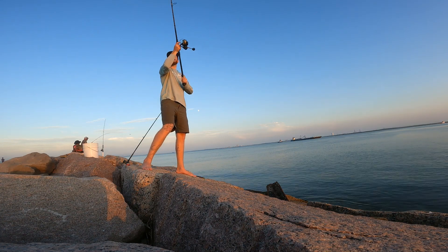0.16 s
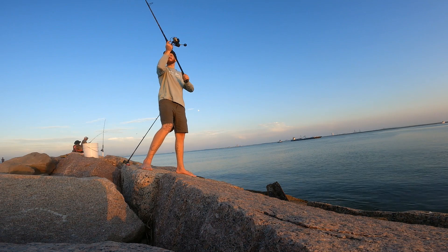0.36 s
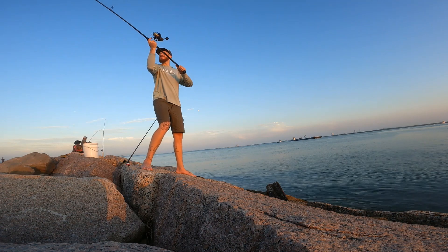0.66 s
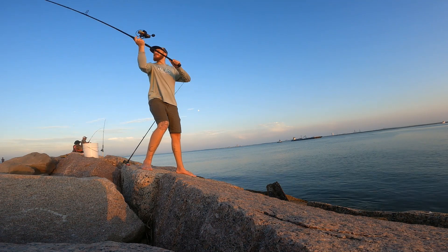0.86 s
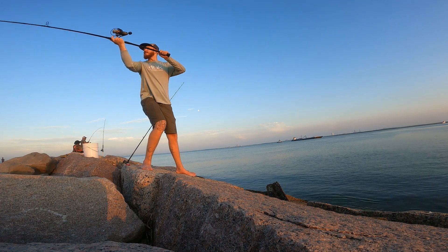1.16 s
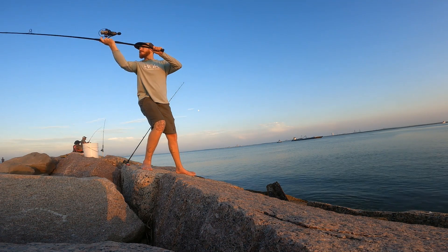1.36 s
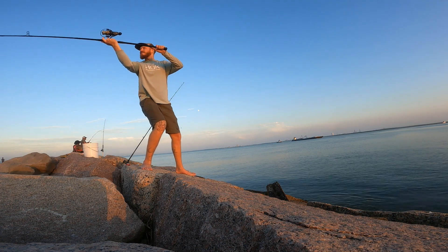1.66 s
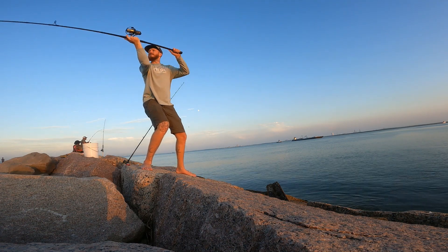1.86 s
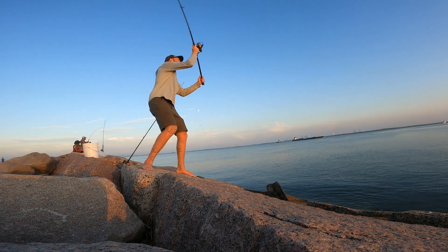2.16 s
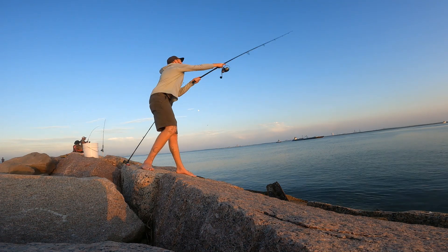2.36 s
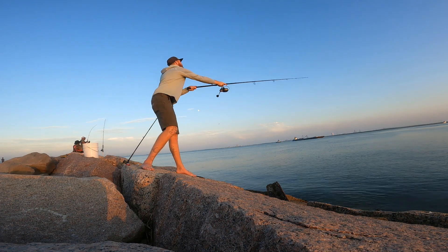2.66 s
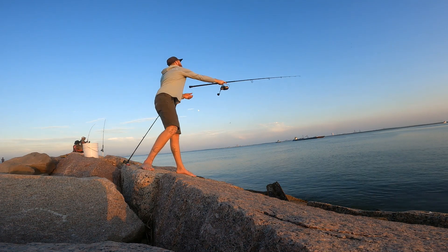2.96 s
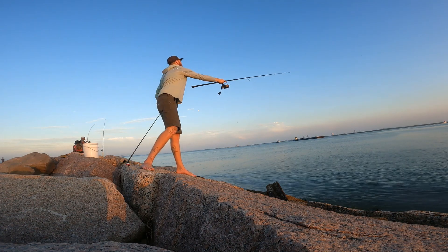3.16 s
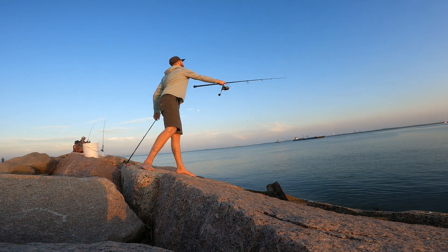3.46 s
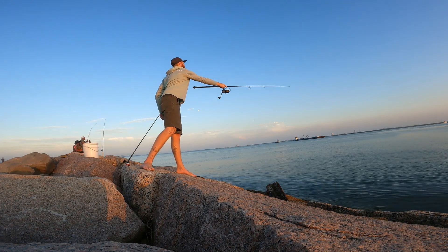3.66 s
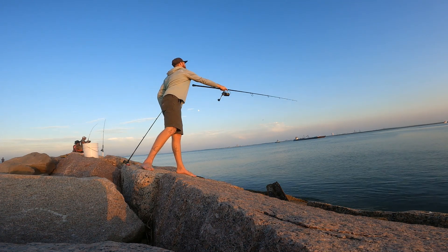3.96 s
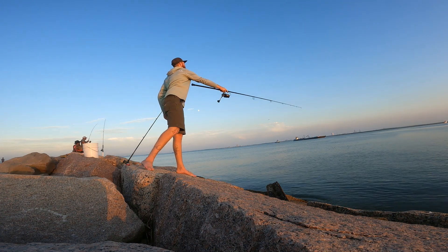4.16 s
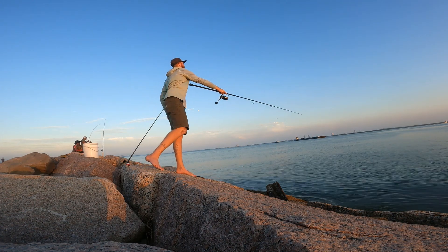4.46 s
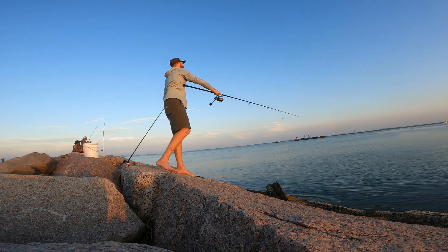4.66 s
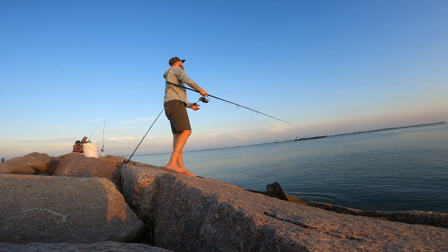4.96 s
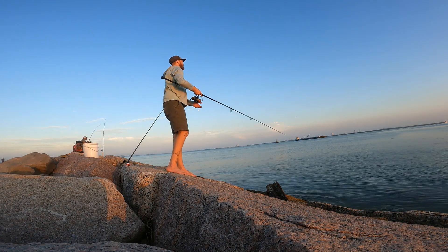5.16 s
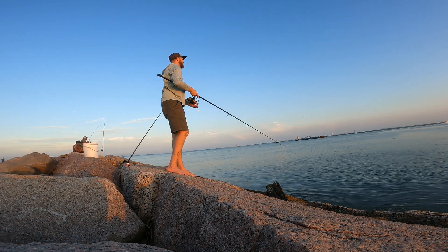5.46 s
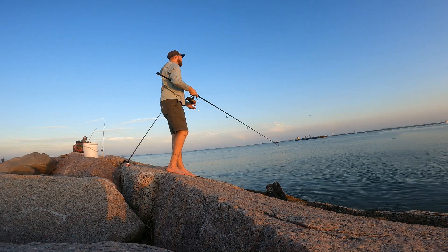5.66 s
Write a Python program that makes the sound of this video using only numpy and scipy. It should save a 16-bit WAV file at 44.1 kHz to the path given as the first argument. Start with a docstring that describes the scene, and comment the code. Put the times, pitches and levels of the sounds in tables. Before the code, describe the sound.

The whole six seconds sit on a steady low rumble of far diesel engines, beating slowly, with a soft wash of small waves and tiny ringing droplets among rocks. In the first two seconds there are only faint handling clicks and very quiet birdlike chirps. A slightly clearer reel click comes at 2.3 s, then at about 2.4 s the rod swings: a very short, ragged, rising swish, by far the loudest event, topped by a cluster of dry, bright snaps. From 2.5 s line hisses thinly off the spool, airy and fluttering, with brief squeals until about 3.1 s and irregular taps. Small rising zips occur around 3.4-3.6 s. The hiss gradually weakens and darkens, with more light taps near 4.5-4.7 s. At 4.9 s it stops with a dry metallic clack and short rattle. Water and engine rumble continue. Open air, stereo, only slight scatter from the rocks.

```python
"""Rock jetty by the water: an angler makes one long cast with a spinning rod.
The rod and line swish as moving tones in ragged noise; the released line cracks on the guides as short bursts.
It then hisses off the spool as noise tied to a falling line speed, with squeals and taps, until the bail clacks.
Behind: noise wash of small waves, ringing droplets, beating ship diesels in harmonics, faint chirps."""
import sys
import numpy as np
from scipy import signal
from scipy.fft import rfft, irfft
from scipy.io import wavfile
from scipy.ndimage import uniform_filter1d, map_coordinates

SR = 44100
rng = np.random.default_rng(int(sys.argv[2]) if len(sys.argv) > 2 else 0)


def wav_out(sig):
    """Save sig, one row per channel (or a flat mono array), as 16-bit PCM at SR to the path in sys.argv[1]."""
    wavfile.write(sys.argv[1], SR, np.round(np.clip(np.atleast_2d(sig).T, -1, 1) * 32767).astype(np.int16))


N = 255780
TIME = np.arange(N) / SR  # s
BINS = np.fft.rfftfreq(N, 1 / SR)  # Hz


# Rod strokes, forward swing then tip spring-back: t at full speed/s, rise/s, hold/s, fall/s,
# air rush level/dB, shaft level/dB, tip level/dB, tip f at t/Hz, tip width/Hz
ROD_STROKES = [(2.424, 0.032, 0.018, 0.024, -35.5, -39, -41, 2328, 600),
               (2.525, 0.083, 0.011, 0.017, -62, -60, -49.5, 2580, 191)]
# Air rush spectrum: f/Hz, relative level/dB
AIR_RUSH = [(300, -0.5), (520, 11), (690, 22.5), (850, 6.5), (1250, 7), (1550, -10), (1950, 6),
            (3000, -5.5), (4200, 5.5), (5000, -7), (6000, 0.5), (7500, -6.5), (8800, -9), (12000, -18),
            (15000, -31)]
# Thin line swung up to speed; f holds at LEADER_S
LEADER_S, LEADER_RISE_S, LEADER_HOLD_S, LEADER_FALL_S = 2.345, 0.048, 0.064, 0.03
LEADER_DB, LEADER_HZ, LEADER_GLIDE_HZ_PER_S, LEADER_WIDTH_HZ = -56, 4720, 22000, 1700
TIP_GLIDE_HZ_PER_S = 1300
# Thick shaft, loudest just after the tip
SHAFT_LAG_S, SHAFT_RISE_S, SHAFT_HOLD_S, SHAFT_FALL_S = 0.0034, 0.021, 0.038, 0.0075


def swish(shaft_ratio=0.435, shaft_wander_hz=70, ragged_db=2.0, ragged_hz=130):
    """Shed vortices: the thick shaft sings low, the thin tip higher, the line highest, over an air rush."""
    leader_hz = LEADER_HZ + LEADER_GLIDE_HZ_PER_S * (TIME - LEADER_S)
    leader_gain = envelope(LEADER_S, LEADER_RISE_S, LEADER_HOLD_S, LEADER_FALL_S)
    out = amp(LEADER_DB) * whistle(leader_hz, LEADER_WIDTH_HZ) * leader_gain
    rush = unit(noise(AIR_RUSH))
    for s, rise, hold, fall, rush_db, shaft_db, tip_db, hz, tip_width in ROD_STROKES:
        tip_hz = hz + TIP_GLIDE_HZ_PER_S * (TIME - s)
        tip = amp(tip_db) * whistle(tip_hz, tip_width)
        out += (amp(rush_db) * rush + tip) * envelope(s, rise, hold, fall)
        shaft = amp(shaft_db) * tone(shaft_ratio * tip_hz, shaft_wander_hz)
        out += shaft * envelope(s + SHAFT_LAG_S, SHAFT_RISE_S, SHAFT_HOLD_S, SHAFT_FALL_S)
    return out * unit(amp(ragged_db * drift(ragged_hz)))


# Line whipping tight on the guides: t/s, level/dB, rise/s, decay/s, ring centre f/Hz, ring spread/Hz,
# share of broad crack/0-1, crack treble edge f/Hz
LINE_WHIPS = [(2.4145, -27, 0.00058, 0.0015, 4170, 600, .55, 8000),
              (2.4162, -29.5, 0.00046, .0018, 6000, 900, 1, 18000),
              (2.419, -36, .001, 0.0027, 2060, 400, 0.02, 7000),
              (2.4268, -35, 0.0015, 0.0025, 2100, 500, .1, 8000),
              (2.43, -22, .0007, 0.0029, 3400, 895, .2, 5500),
              (2.435, -33, 0.0018, .007, 1270, 300, 0.04, 7000),
              (2.4383, -29.5, .002, .003, 6100, 500, .05, 7000),
              (2.4410, -25, 0.00082, 0.0018, 6100, 400, 0, 7000),
              (2.4406, -31, 0.00083, .003, 2400, 500, .1, 5000),
              (2.4465, -37.5, .001, .003, 6100, 400, .2, 5000),
              (2.4552, -37.5, .001, .005, 2400, 400, 0, 7000),
              (2.461, -45, .0015, .004, 6100, 400, 0.03, 7000)]
# Broad crack spectrum: f/Hz, relative level/dB
CRACK_SPECTRUM = [(600, 5), (2000, -3.5), (4000, 1), (6500, 5.5), (8200, 2), (9000, -12), (10300, -19),
                  (11700, 3), (13000, -10), (15000, -37)]


def whips(size=2048):
    """Line blows on the guides: each mixes a low-passed noise crack with ringing rod modes."""
    out, crack = np.zeros(N), noise(CRACK_SPECTRUM)
    for s, db, rise, decay, hz, width, broad, edge_hz in LINE_WHIPS:
        broad = np.clip(broad, 0, 1)
        lowpass = signal.butter(2, min(edge_hz, SR / 2 - 1), fs=SR, output="sos")
        dulled = signal.sosfilt(lowpass, crack[round(s * SR):][:size])
        source = np.sqrt(broad) * unit(dulled) + np.sqrt(1 - broad) * rod_ring(hz, width, size)
        add(out, s, amp(db) * burst(source, rise, decay))
    return out


# Line run from release to stop
RUN_START_S, RUN_RISE_S, RUN_STOP_S, RUN_FALL_S = 2.48, 0.02, 4.89, 0.035
DRAG_S = 1.86  # time constant of the slowing


def line_speed():
    """Speed relative to release: air drag slows the line exponentially."""
    return np.exp(-np.maximum(TIME - RUN_START_S, 0) / DRAG_S)


def line_out():
    """Gain that is 1 while the line runs."""
    return envelope(RUN_START_S, RUN_RISE_S, RUN_STOP_S - RUN_START_S, RUN_FALL_S)


def running(full_db, steepness):
    """Gain of a line sound: full_db at full speed, losing steepness dB per dB of speed lost."""
    return amp(full_db) * line_speed() ** steepness * line_out()


# Rub spectrum: f as multiple of centre, relative level/dB
RUB_SPECTRUM = [(.3, -22), (.5, -6), (.6, -5), (.73, -5), (0.919, 1), (1.1, -0.5), (1.3, -9), (1.55, -17.5),
                (2.2, -35.5)]
# Rub centre through the flight: t/s, f/Hz
RUB_CENTRE_PATH = [(2.47, 6724), (2.95, 7260), (3.75, 7066), (4.3, 6400), (4.88, 5690)]
# Spool fizz spectrum: f/Hz, relative level/dB
FIZZ_SPECTRUM = [(6000, -30.5), (9000, -8.5), (10300, -0.5), (11000, -1), (12100, 2.5), (13200, -7.5),
                 (14000, -27), (15000, -39)]
# Brief fizz flares: the line slipping off the finger before release, then loose coils brushing the spool lip:
# t/s, length/s, level/dB
FIZZ_BRUSHES = [(2.29, .045, -78), (4.5, 0.053, -77.5), (4.895, 0.034, -80)]
# Guide frame ring: f/Hz, width/Hz, relative level/dB
GUIDE_RINGS = [(2410, 270, -5.5), (4320, 200, 1.5), (6300, 220, -6.5)]
COILS_PER_S = 340  # at full speed
RUB_DB, RUB_STEEPNESS, RUB_FLOOR_DB = -57, 1.1, -65.5
FIZZ_DB, FIZZ_STEEPNESS, FIZZ_TOP_DB = -54.5, 4.9, -64  # gain capped at FIZZ_TOP_DB
RING_DB, RING_STEEPNESS = -65.5, 1


def line(flutter=0.12, grain_db=1.1, uneven_db=1.4, brush_fade_s=0.014):
    """Coils peel off the spool and rub through the guides: hiss, fizz and frame ring follow line speed."""
    centre_hz = np.interp(TIME, *np.transpose(RUB_CENTRE_PATH))
    top_hz = centre_hz.max()
    # Line texture read at a varying rate, so its spectrum follows centre_hz
    texture = noise([(multiple * top_hz, db) for multiple, db in RUB_SPECTRUM])
    rub = unit(map_coordinates(texture, [np.cumsum(centre_hz / top_hz)], order=3, mode="wrap"))
    rub_gain = np.maximum(running(RUB_DB, RUB_STEEPNESS), amp(RUB_FLOOR_DB) * line_out())

    fizz_gain = np.minimum(running(FIZZ_DB, FIZZ_STEEPNESS), amp(FIZZ_TOP_DB))
    for s, length, db in FIZZ_BRUSHES:
        fizz_gain = fizz_gain + amp(db) * envelope(s, brush_fade_s, length, brush_fade_s)
    fizz = fizz_gain * amp(uneven_db * drift(25)) * unit(noise(FIZZ_SPECTRUM))

    contact = unit(amp(2.5 * drift(160)))  # uneven touch on the frames
    frames = unit(sum(amp(db) * whistle(hz, width) for hz, width, db in GUIDE_RINGS))
    ring = contact * running(RING_DB, RING_STEEPNESS) * frames

    coil_hz = COILS_PER_S * line_speed() * (1 + 0.12 * drift(30))
    coils = 1 + flutter * np.sin(2 * np.pi * np.cumsum(coil_hz) / SR)
    return (rub_gain * rub + fizz + ring + squeals()) * coils * amp(grain_db * drift(250))


# Line squeals on the guides: t/s, length/s, f/Hz, level before squeal_db/dB
LINE_SQUEALS = [(2.588, .018, 4280, -59), (2.602, .015, 6440, -61), (2.695, .034, 6440, -60),
                (2.737, .06, 3690, -60), (2.765, .035, 4300, -60.5), (2.84, .04, 3730, -62.5),
                (2.925, .03, 4240, -61), (2.955, .095, 3680, -63), (3.105, .025, 4300, -67)]


def squeals(wander_hz=55, fuzz_db=-1.5, fuzz_width_hz=260, fade_s=0.016, flutter_db=3.0, flutter_hz=130,
            squeal_db=-3.0):
    """The fast line squeals on the guides: thin tones with a fuzzy edge and fluttering level."""
    out = np.zeros(N)
    for s, length, hz, db in LINE_SQUEALS:
        voice = tone(hz, wander_hz) + amp(fuzz_db) * whistle(hz, fuzz_width_hz)
        out += amp(db + squeal_db) * voice * envelope(s, fade_s, length, fade_s)
    return out * unit(amp(flutter_db * drift(flutter_hz)))


def patter(per_s=55, touch_db=-62, steepness=0.35, spread_db=2.5, hz=4000, width_hz=1100, decay_s=0.0022,
           count=8, size=1024):
    """Random small touches of the line on the rod, weaker as it slows."""
    out = np.zeros(N)
    for ring_hz in hz * np.geomspace(0.8, 1.3, count):
        strength = amp(spread_db * np.minimum(rng.exponential(1, N), 3))
        touches = (rng.random(N) < per_s / count / SR) * strength
        tap = burst(whistle(ring_hz, width_hz, size), 0.0006, decay_s)
        out += signal.oaconvolve(touches, tap)[:N]
    return out * running(touch_db, steepness)


# Line loops slapping the rod: t/s, peak level before slap_db/dB, colour f/Hz
LOOP_SLAPS = [(2.555, -40, 3520), (2.57, -43.5, 3390), (2.589, -42, 3740), (2.6118, -50, 3580),
              (2.652, -46, 3500), (2.6663, -42.5, 3940), (2.6805, -42.5, 3740), (2.7088, -47, 3960),
              (2.7674, -48, 3740), (2.9453, -48, 4190), (3.0607, -51, 3660), (3.083, -52, 3730),
              (3.3573, -49, 2940), (3.437, -50, 2820), (3.546, -54, 4170), (3.581, -52, 3700),
              (3.734, -53, 4320), (4.061, -57, 3660), (4.111, -55, 4100), (4.122, -54, 3620),
              (4.1887, -51.5, 3970), (4.289, -59, 3700), (4.316, -60, 3770), (4.377, -55, 3990),
              (4.5006, -53, 4100), (4.5631, -54, 3900), (4.6415, -49.5, 3970), (4.648, -54, 4200),
              (4.662, -53, 4500), (4.705, -57, 3640), (4.727, -55, 4370)]


def slaps(slap_db=-3.5, spread_hz=800, decay_s=0.005, scrape_db=-3, scrape_width_hz=1700, size=2048):
    """Loose loops of line tap the rod (modes) and scrape it (resonant noise)."""
    out = np.zeros(N)
    for s, db, hz in LOOP_SLAPS:
        source = rod_ring(hz, spread_hz, size) + amp(scrape_db) * whistle(hz, scrape_width_hz, size)
        add(out, s, amp(db + slap_db) * burst(source, 0.00046, decay_s))
    return out


# Slack line slips: t/s, length/s, start f/Hz, end f/Hz, level before zip_db/dB
LINE_ZIPS = [(3.432, .007, 4400, 5400, -54), (3.449, .009, 2090, 4220, -48), (3.486, .007, 4600, 6300, -57),
             (3.571, .01, 1700, 3900, -49), (3.579, 0.0072, 4420, 6450, -50),
             (3.638, .008, 4480, 5700, -57)]


def zips(zip_db=-1.5, width_hz=900):
    """Slack line slips along the rod, each slip a short rising squeak."""
    out = np.zeros(N)
    for s, length, start_hz, end_hz, db in LINE_ZIPS:
        size = round(length * SR)
        squeak = whistle(np.linspace(start_hz, end_hz, size), width_hz, size) * np.hanning(size)
        add(out, s, amp(db + zip_db) * squeak)
    return out


# Reel clicks in the hand: t/s, peak level before click_db/dB, treble level before treble_db/dB
REEL_CLICKS = [(0.0875, -59, -29), (0.12, -62.5, -10), (.402, -63, -14), (.417, -64, -17),
               (1.163, -63, -20), (1.288, -64, -19), (1.673, -54.5, -31), (2.313, -48, -6),
               (4.8965, -59, -8), (4.901, -60, -12)]
# Click body spectrum: f/Hz, relative level/dB
REEL_BODY = [(1000, -8.5), (2300, -2.5), (3700, 4), (4500, 1), (5500, -6), (7300, -1.5), (8500, -16),
             (15000, -41.5)]


def clicks(click_db=1.5, decay_s=0.0051, treble_db=-4, size=2048):
    """Dry clicks of the handled reel: bursts of body noise plus treble."""
    out, body, treble = np.zeros(N), unit(noise(REEL_BODY)), unit(noise(FIZZ_SPECTRUM))
    for s, db, bright_db in REEL_CLICKS:
        source = (body + amp(bright_db + treble_db) * treble)[round(s * SR):][:size]
        add(out, s, amp(db + click_db) * burst(source, 0.00071, decay_s))
    return out


# Bail clack spectrum: f/Hz, relative level/dB
BAIL_CLACK = [(300, -5), (700, 5), (1400, 4.5), (2500, 1.5), (3200, 0), (4300, 2), (6000, -6), (8000, -9),
              (11500, -10), (13500, -18), (15000, -34)]
# Loose reel parts spectrum: f/Hz, relative level/dB
REEL_RATTLE = [(300, -2.5), (700, 12), (1400, 10.5), (2500, 1), (3200, -7.5), (4400, 1), (6000, -9),
               (7500, -18), (11500, -23), (15000, -46)]


def bail(s=4.9142, clack_db=-42.0, clack_decay_s=0.0013, rattle_db=-47.5, rattle_lead_s=0.014,
         rise_s=0.018, decay_s=0.03, size=8192):
    """The bail arm shuts with a dry noise clack; loose reel parts rattle around it as random grains."""
    out = np.zeros(N)
    add(out, s, amp(clack_db) * burst(noise(BAIL_CLACK)[:size], 0.00044, clack_decay_s))
    rattle = colour(grains(2500, 2.5, size), REEL_RATTLE)
    add(out, s - rattle_lead_s, amp(rattle_db) * burst(rattle, rise_s, decay_s))
    return out


def tackle():
    """Sum of all rod, reel and line sounds."""
    return swish() + whips() + line() + patter() + slaps() + zips() + clicks() + bail()


# Rumble: f/Hz, level/dB per Hz
RUMBLE_SPECTRUM = [(8, -73.5), (25, -57), (45, -60), (70, -43.5), (110, -48.5), (137, -53), (155, -58),
                   (180, -56), (220, -66.5), (250, -57), (300, -67.5), (420, -72), (800, -95), (2000, -140)]
# Wave wash: f/Hz, level before wash_db/dB per Hz
WASH_SPECTRUM = [(100, -87.5), (350, -68), (500, -69.5), (660, -73), (820, -79.5), (1200, -82.5),
                 (1600, -88), (2100, -90.5), (2800, -97), (3200, -102), (4400, -103.5), (6500, -114),
                 (8500, -124), (15000, -137)]
# Larger waves and lulls: middle t/s, half length/s, level change/dB
WASH_SURGES = [(0.029, 0.11, 2), (1.2, 0.54, -1.5), (3.417, 0.048, 3), (4.098, .06, 0.5),
               (5.365, 0.43, 1.5)]
# Shore left-right likeness: f/Hz, likeness/0-1
SHORE_LIKENESS = [(25, 0.9), (70, 1), (280, 1), (600, 0.98), (1200, 0.96), (2400, 1), (4000, 0.5),
                  (6000, 0.93), (13000, 0.9)]
# Shore left-right balance: f/Hz, level/dB
SHORE_LEAN = [(170, 0), (350, -1.5), (550, -0.7), (850, -3), (1100, -0.5), (2050, -3.5), (2550, -0.3),
              (4000, -4), (5700, -2), (7200, 1), (13000, 1.5)]


def shore(wash_db=0.26, lapping_db=0.76):
    """Distant rumble, and the noise wash of small waves that swells and laps."""
    surge_db = sum(db * np.exp(-((TIME - s) / half) ** 2) for s, half, db in WASH_SURGES)
    level = amp(wash_db + surge_db + lapping_db * drift(22))
    a, b = [noise(RUMBLE_SPECTRUM) + level * noise(WASH_SPECTRUM) for _ in range(2)]
    return ports(a, b, SHORE_LIKENESS, SHORE_LEAN)


def droplets(per_s=70, drop_db=-68.5, spread_db=3, slope_db_per_octave=-8, count=24):
    """Tiny bubbles ring between the rocks: decaying rising sines, the higher ones fainter."""
    out, t = np.zeros((2, N)), np.arange(1024) / SR
    for hz in np.geomspace(900, 6000, count):
        strength = amp(spread_db * np.minimum(rng.exponential(1, N), 3.5))
        pops = (rng.random(N) < per_s / count / SR) * strength
        ring = np.sin(2 * np.pi * hz * t * (1 + 3 * t)) * np.exp(-t * hz / 9)
        side = rng.uniform(-0.3, 0.3)
        gain = amp(drop_db + slope_db_per_octave * np.log2(hz / 3000))
        out += np.outer([1 + side, 1 - side], signal.oaconvolve(pops, ring)[:N]) * gain
    return out


# Far diesels: cycle rate/Hz, then level/dB of orders 5 to 11
SHIP_DIESELS = [(8.76, -48, -42.5, -33.5, -28.5, -34, -32.5, -39),
                (9.015, -43, -45, -37.5, -33.5, -32, -46.5, -42.5),
                (9.3, -50.5, -43.5, -51, -43, -36, -58, -46)]
# Other ship machines: f/Hz, level/dB
SHIP_HUM = [(86.3, -37), (90.75, -35), (116, -35), (135, -39.5), (171.8, -42.5), (174.7, -51.5),
            (181.5, -44.5), (363, -48.5), (453.7, -59)]
HUM_SWELL_S, HUM_SWELL_HALF_S, HUM_SWELL_DB_PER_OCTAVE = 4.05, 0.54, 1.5


def ships(wander=0.0012, hum_wander=0.002, shimmer_db_per_octave=1.13):
    """Diesels at slightly different speeds beat against each other; machine hum swells once."""
    out = np.zeros(N)
    for cycle_hz, *orders_db in SHIP_DIESELS:
        turns = np.cumsum(cycle_hz * (1 + wander * drift(0.91))) / SR
        for order, db in enumerate(orders_db, 5):
            out += amp(db) * np.sin(2 * np.pi * (order * turns + rng.random()))
    swell = HUM_SWELL_DB_PER_OCTAVE * np.exp(-((TIME - HUM_SWELL_S) / HUM_SWELL_HALF_S) ** 2)
    for hz, db in SHIP_HUM:
        turns = np.cumsum(hz * (1 + hum_wander * drift(1.41))) / SR
        octaves = np.log2(hz / SHIP_HUM[0][0])  # higher tones shimmer most on their way over the water
        level_db = db + (swell + shimmer_db_per_octave * drift(8)) * octaves
        out += amp(level_db) * np.sin(2 * np.pi * (turns + rng.random()))
    return np.sqrt(2) * out  # sine levels are rms


# Faint chirps, as of shore birds: t/s, length/s, mid f/Hz, glide/Hz per s, level before far_db/dB
FAR_CHIRPS = [(0.0, 0.14, 2050, 3, -56), (0.356, .085, 3560, -300, -67), (.485, .046, 3500, -3000, -64.5),
              (.77, .09, 3970, -2000, -70), (.925, .035, 4530, 0, -66), (1.235, .065, 3790, 4000, -66.5),
              (1.336, .025, 1396, 2, -48), (1.56, .09, 2250, -1, -57), (1.944, .06, 2590, 0, -57)]


def chirps(wander_hz=45, far_db=-6.0, flutter_db=3.0, flutter_hz=60):
    """Short far calls: wandering, gliding tones with fluttering level."""
    out = np.zeros(N)
    for s, length, hz, glide, db in FAR_CHIRPS:
        size = round(length * SR)
        pitch = hz + glide * (np.arange(size) / SR - length / 2)
        call = tone(pitch, wander_hz, size) * signal.windows.tukey(size)
        add(out, s, amp(db + far_db) * call)
    return out * unit(amp(flutter_db * drift(flutter_hz)))


# Rod and guide modes: f/Hz, relative level/dB
ROD_MODE_TABLE = [(1270, 0), (2060, 0), (2400, -4), (2830, 3), (3370, 1), (3720, -4.5), (4260, 0),
                  (5300, -4.5), (6060, 0.5), (6950, -3)]


def rod_ring(centre_hz, spread_hz, size, wander_hz=90):
    """A blow wakes the rod's modes, most of all those near its centre."""
    ring = np.zeros(size)
    for hz, db in ROD_MODE_TABLE:
        nearness = 1 / (1 + ((hz - centre_hz) / spread_hz) ** 4)
        ring += amp(db) * nearness * tone(hz, wander_hz, size)
    return unit(ring)


# Phase by which left leads: f/Hz, phase/rad
LEFT_LEAD = [(250, 0), (500, -.12), (1000, -0.41), (1500, -0.73), (2400, -0.88), (3100, -0.81),
             (4500, -0.45), (6500, -0.079), (12000, 0.15)]


def ports(a, b, same, balance):
    """Two unrelated versions of a sound become left and right, partly alike and out of phase."""
    likeness = np.clip(read(same, BINS), 0, 1)
    shared = rfft(a) * np.sqrt((1 + likeness) / 2)
    apart = rfft(b) * np.sqrt((1 - likeness) / 2)
    lean = amp(read(balance, BINS) / 2) * np.exp(0.5j * read(LEFT_LEAD, BINS))
    return irfft(np.array([(shared + apart) * lean, (shared - apart) / lean]), N)


def amp(db):
    """Decibels to gain."""
    return 10 ** (np.asarray(db) / 20)


def unit(x):
    """Scales to rms 1."""
    return x / np.sqrt(np.mean(x ** 2) + 1e-20)


def read(points, hz):
    """Interpolates a spectrum on a log-frequency axis."""
    f, value = np.transpose(points)
    return np.interp(np.log(hz + 1e-6), np.log(f + 1e-6), value)


def noise(points):
    """Noise with the given dB per Hz."""
    return irfft(rfft(rng.standard_normal(N)) * amp(read(points, BINS)), N) * np.sqrt(SR / 2)


def colour(x, points):
    """Filters a sound by a dB spectrum."""
    return irfft(rfft(x) * amp(read(points, np.fft.rfftfreq(len(x), 1 / SR))), len(x))


def drift(rate_hz):
    """Slow random signal of rms 1, with a Gaussian roll-off at rate_hz."""
    return unit(irfft(rfft(rng.standard_normal(N)) * np.exp(-(BINS / rate_hz) ** 2), N))


def whistle(hz, width_hz, size=N):
    """A fuzzy tone of rms 1: noise through a steep resonance that may move."""
    r = np.exp(-np.pi * abs(width_hz) * np.sqrt(2) / SR)
    z = rng.standard_normal(size) + 1j * rng.standard_normal(size)
    z = signal.lfilter([1], [1, -2 * r, r * r], z)
    carrier = np.exp(2j * np.pi * np.cumsum(hz * np.ones(size)) / SR)
    return unit((z * carrier).real)


def tone(hz, wander_hz, size=N, order=220):
    """A clean sine of rms 1 whose pitch wanders a little."""
    wander = unit(uniform_filter1d(rng.standard_normal(size), order))
    turns = np.cumsum(hz + wander_hz * wander) / SR
    return np.sqrt(2) * np.sin(2 * np.pi * (turns + rng.random()))


def grains(per_s, spread_db, size=N):
    """Random one-sample clicks of uneven strength and sign."""
    strength = amp(spread_db * np.minimum(rng.exponential(1, size), 3)) * rng.choice([-1, 1], size)
    return strength * (rng.random(size) < per_s / SR)


def burst(source, rise_s, decay_s):
    """Linear swell and exponential tail; level at the top is about 1."""
    t = np.arange(len(source)) / SR
    shape = np.minimum(t / rise_s, 1) * np.exp(-np.maximum(t - rise_s, 0) / decay_s)
    return unit(source * shape) * np.sqrt(np.mean(shape ** 2))


def envelope(s, rise_s, hold_s, fall_s):
    """Gain that grows exponentially to 1 at time s, holds, then dies away."""
    return np.exp(-np.maximum(s - TIME, 0) / rise_s - np.maximum(TIME - s - hold_s, 0) / fall_s)


def add(mix, s, sound):
    """Mixes a sound in at time s."""
    part = mix[max(round(s * SR), 0):][:len(sound)]
    part += sound[:len(part)]


# Cast left-right likeness: f/Hz, likeness/0-1
CAST_LIKENESS = [(300, 0.58), (1200, 0.99), (3000, 0.84), (6000, .92), (9000, 0.6), (11000, 0.78),
                 (13000, .65)]
# Cast left-right balance: f/Hz, level/dB
CAST_LEAN = [(500, 0), (1400, -0.5), (2300, 2.5), (3300, -2), (4200, 1), (5800, -4), (7200, 2.5),
             (9000, -1), (11000, 0.5), (13000, 2)]


def scene(rock_db=-20, rock_decay_s=0.01, size=4096):
    """The cast, with a short decaying scatter off the rocks, over the background."""
    cast = ports(tackle(), tackle(), CAST_LIKENESS, CAST_LEAN)
    scatter = rng.standard_normal((2, size)) * np.exp(-np.arange(size) / SR / rock_decay_s)
    rocks = signal.oaconvolve(cast, scatter / np.linalg.norm(scatter[0]), axes=1)[:, :N]
    return cast + amp(rock_db) * rocks + shore() + droplets() + ships() + chirps()


def record(dry, edge_hz=15000):
    """Soft ends, then a linear-phase low-pass at edge_hz."""
    ends = signal.windows.tukey(N, 0.002)
    lowpass = signal.firwin(255, edge_hz, window=("kaiser", 9), fs=SR)
    return signal.oaconvolve(dry * ends, lowpass[None], "same")


dry = scene()
out = record(dry)
wav_out(out)
```